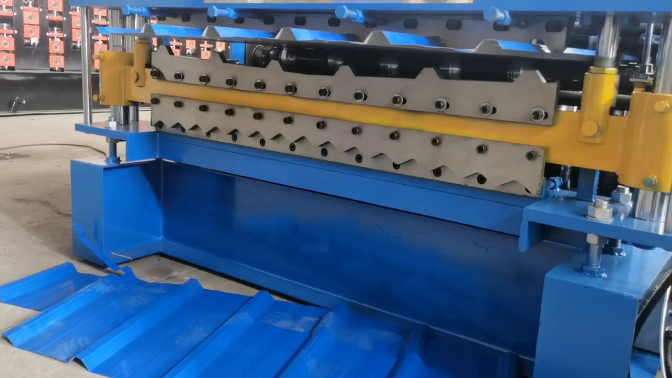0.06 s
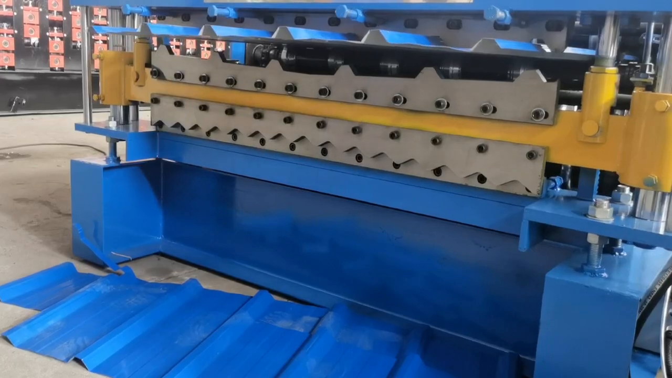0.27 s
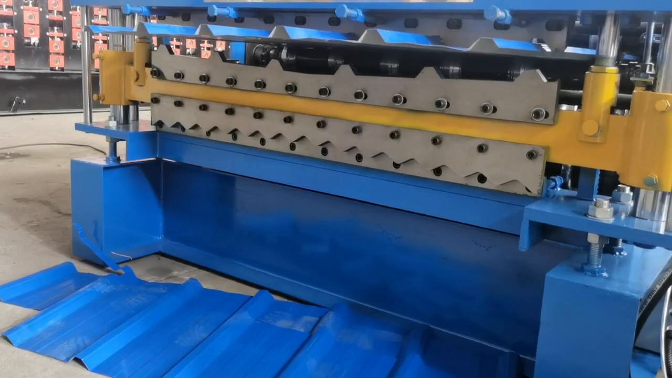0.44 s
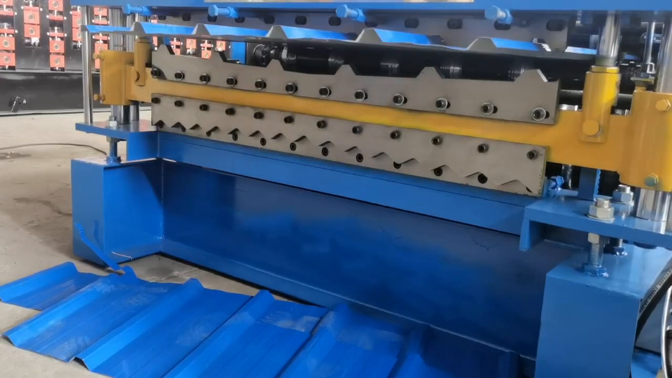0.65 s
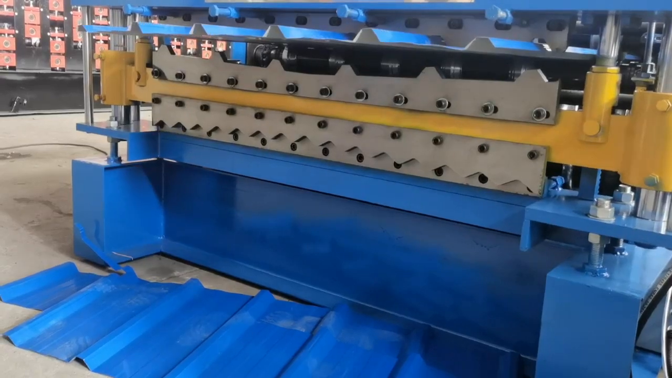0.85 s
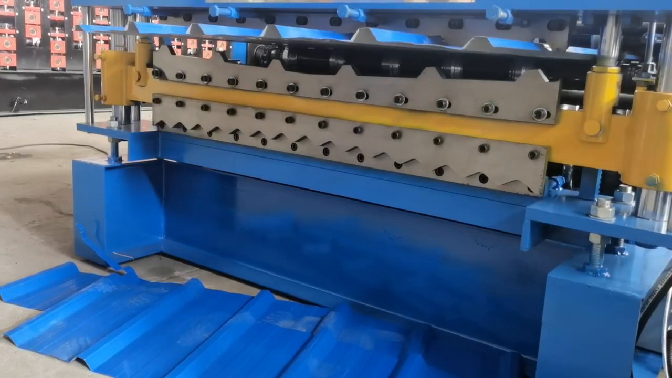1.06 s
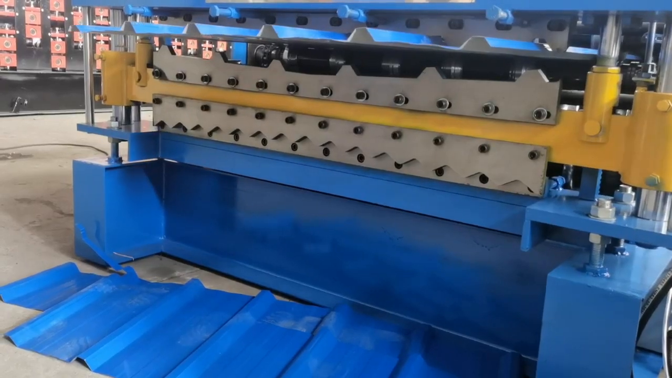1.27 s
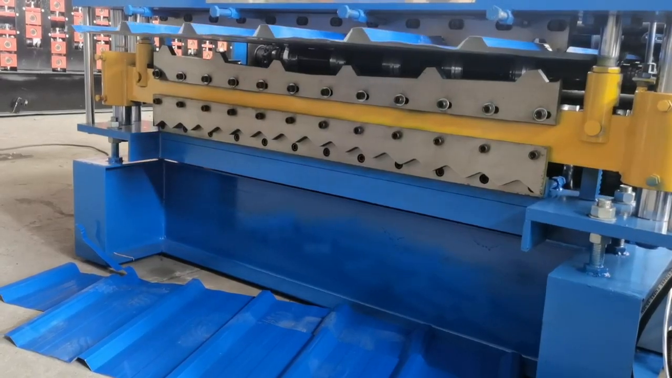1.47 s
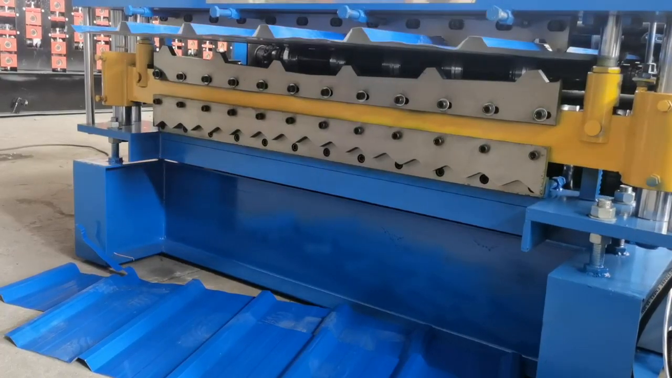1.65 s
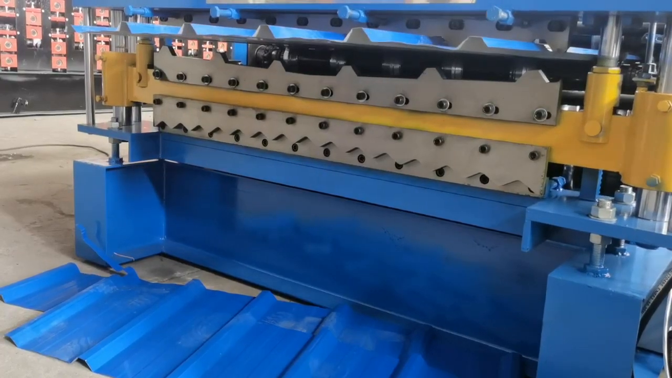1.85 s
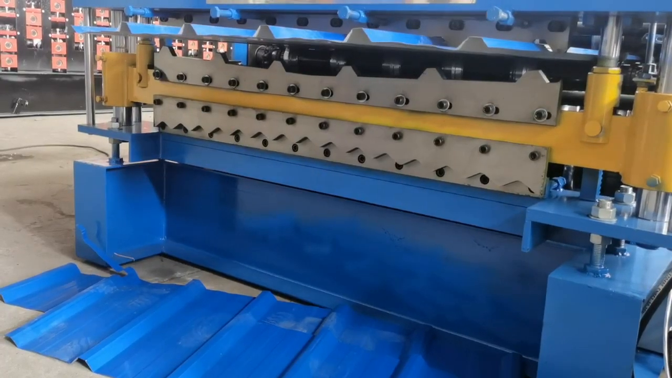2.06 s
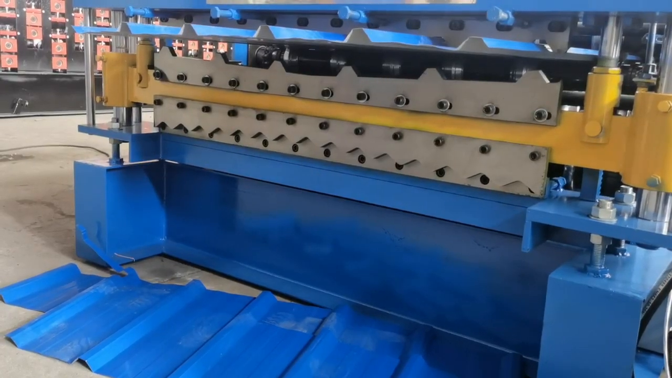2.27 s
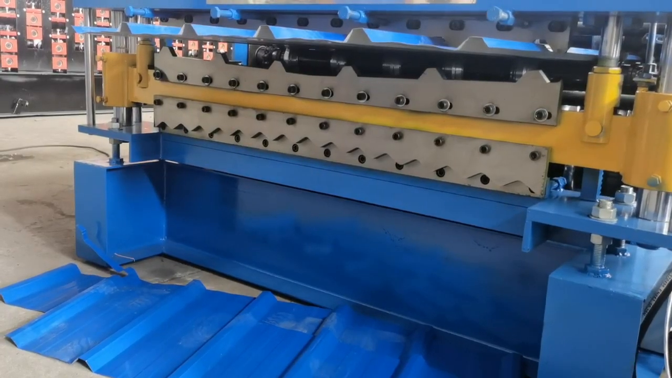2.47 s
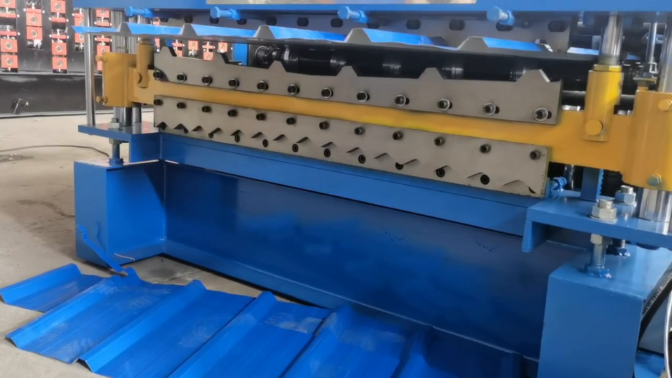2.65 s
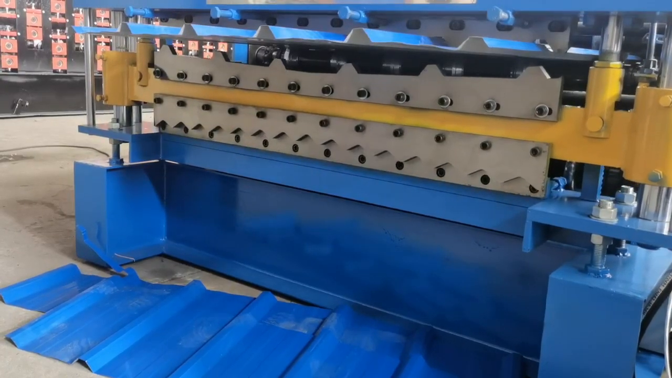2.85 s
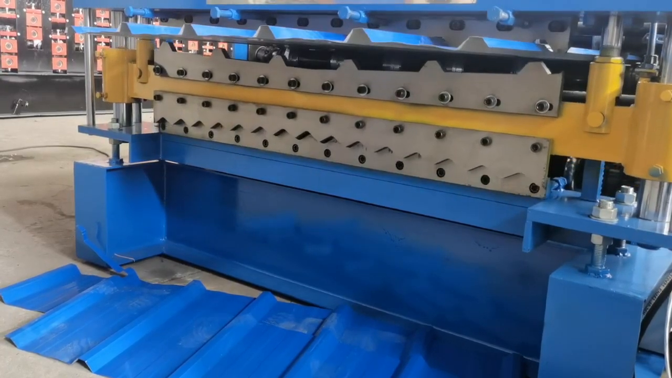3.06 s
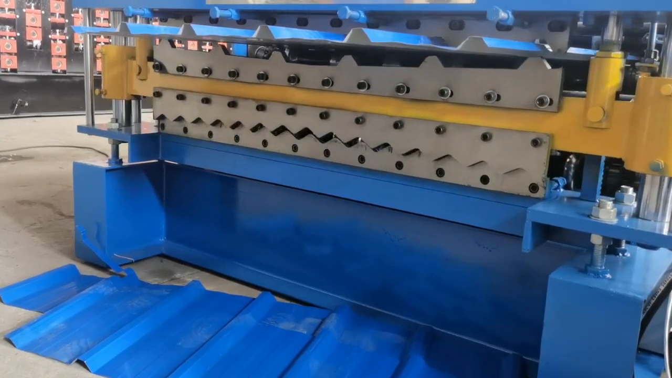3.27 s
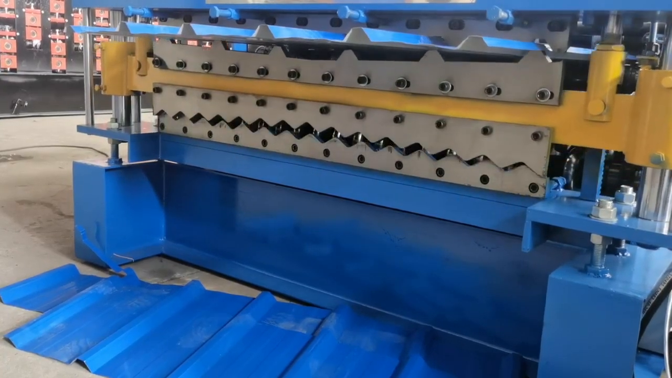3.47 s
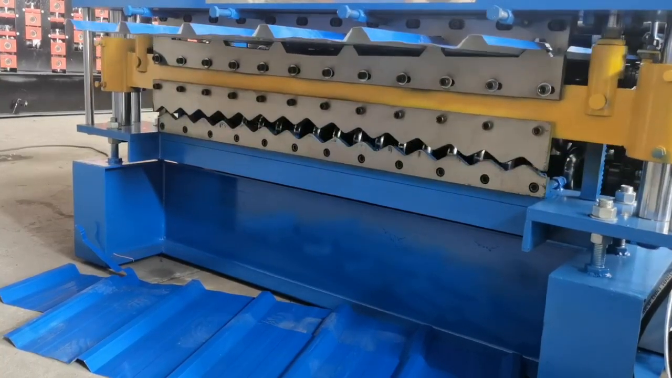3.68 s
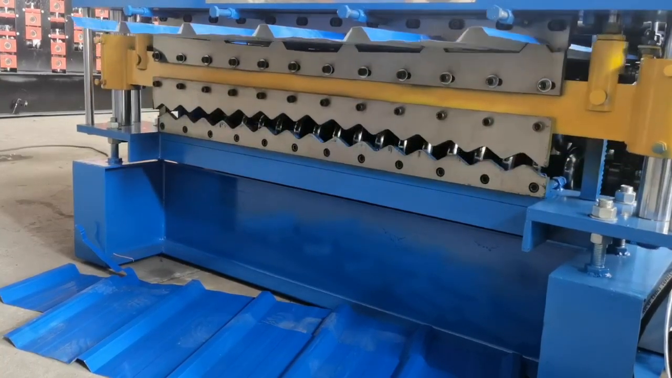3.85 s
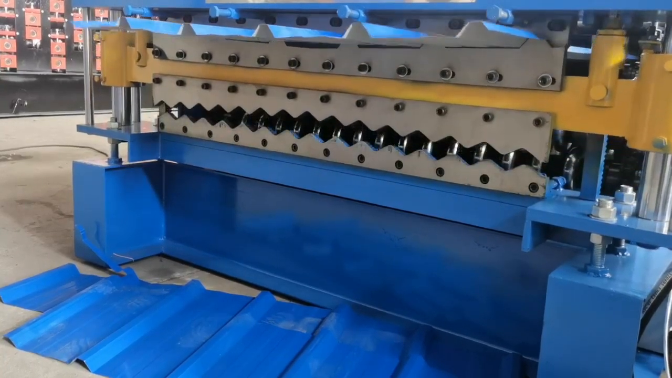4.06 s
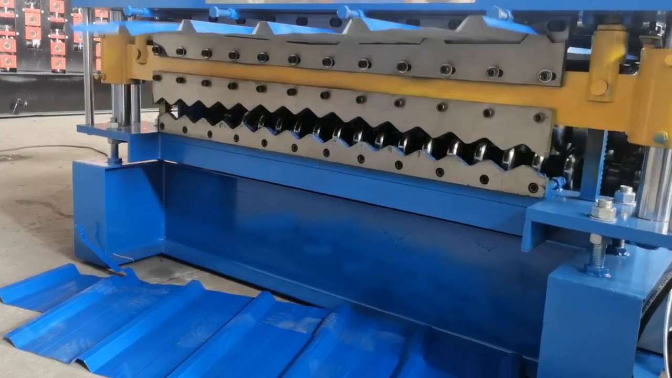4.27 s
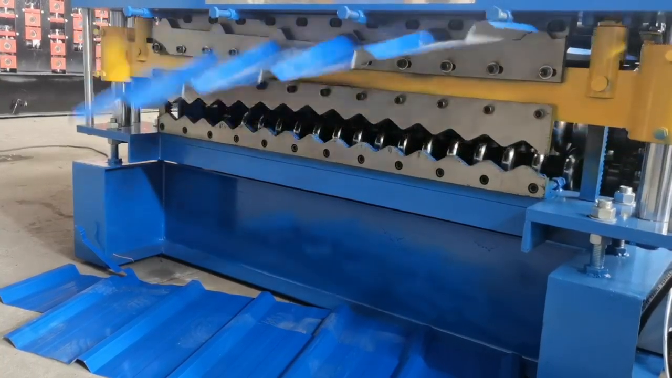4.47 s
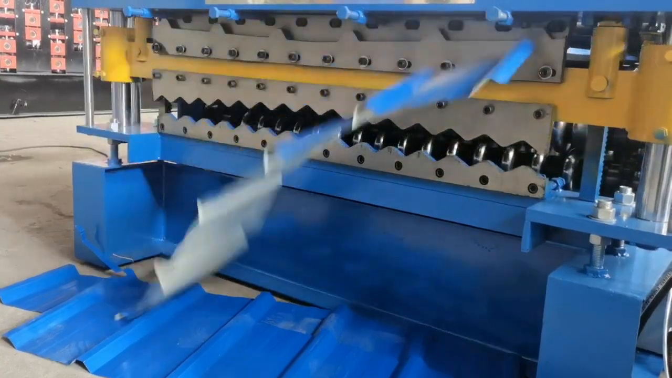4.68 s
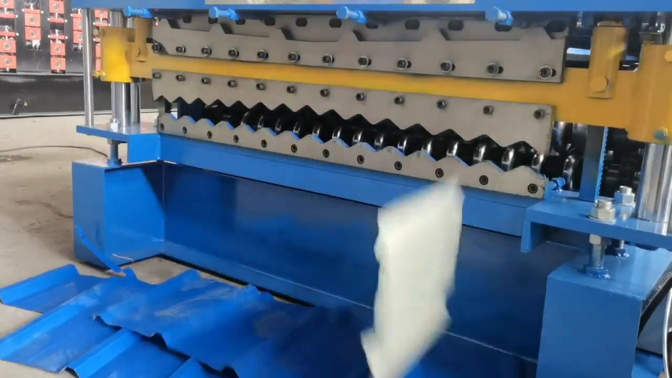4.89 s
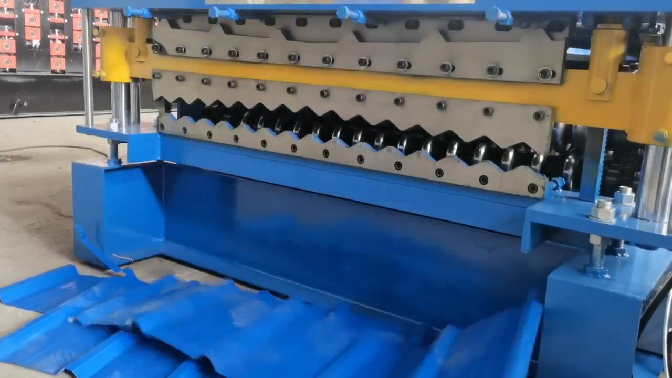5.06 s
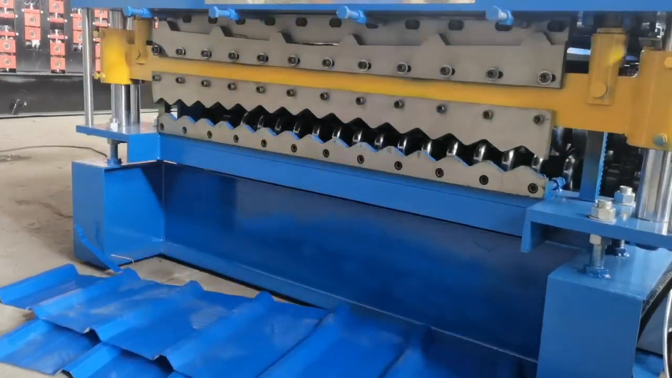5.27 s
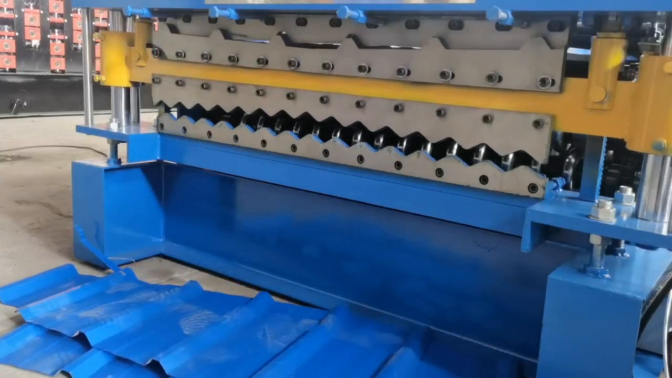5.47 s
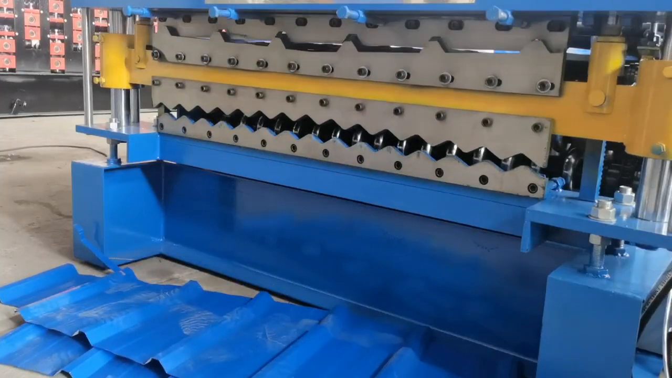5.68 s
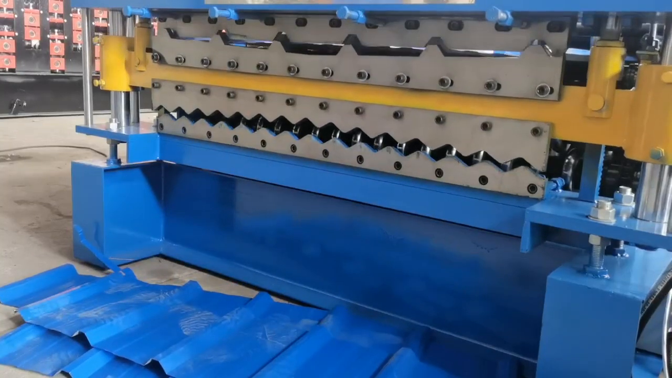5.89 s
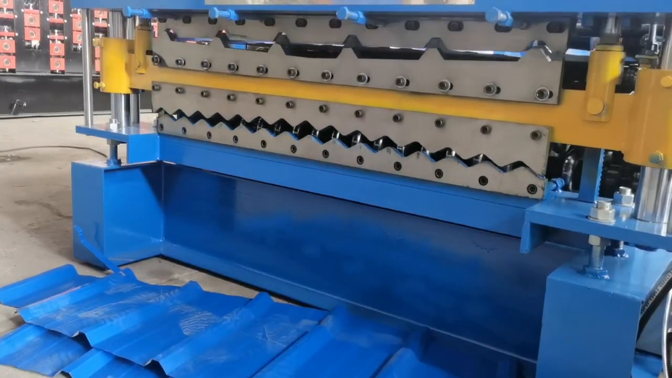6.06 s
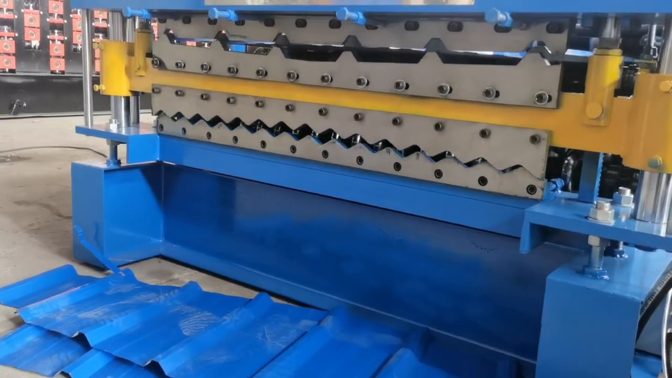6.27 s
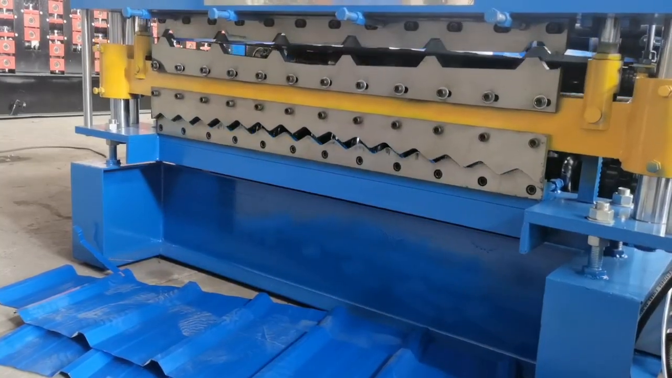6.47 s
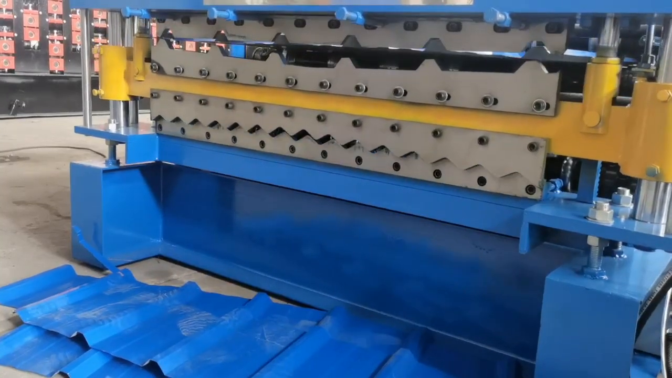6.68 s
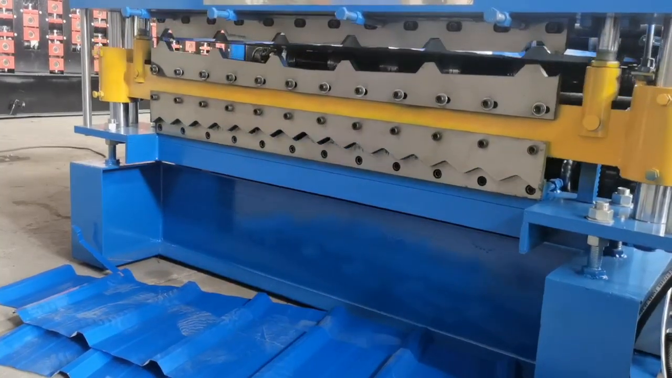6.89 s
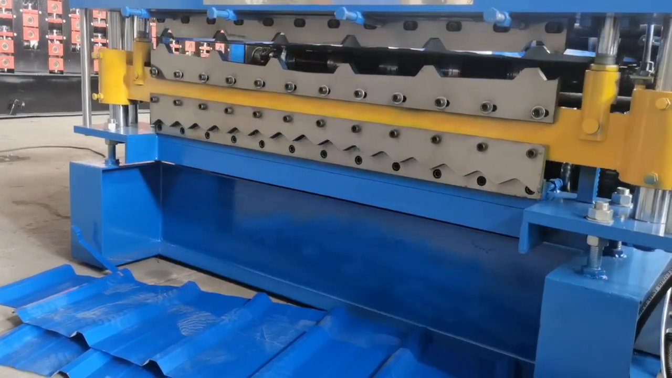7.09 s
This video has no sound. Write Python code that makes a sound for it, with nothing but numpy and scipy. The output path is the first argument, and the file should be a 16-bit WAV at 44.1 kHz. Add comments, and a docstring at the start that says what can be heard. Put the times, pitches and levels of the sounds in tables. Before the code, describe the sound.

Close view of a metal shear in an echoing workshop: low uneven machine hum, oil rush and a faint piercing electrical whine that soon drops away. The hydraulics shudder and strain, growing much louder. Then roofing steel buckles with dull booms, sharp cracks and tearing rattle, scrapes briefly, slaps onto a pile and rings out. The pump eases into a softer, steady hissing whir.

```python
"""Hydraulic shear cutting a roofing panel

The hydraulic shear of a roll forming line cuts off a thin steel panel in a factory hall.
The pump is built from tones locked to its shaft over filtered noise; a motor drive whines beside it.
The pump labours as the blade comes down, then eases on the return stroke.
The steel crackles and tears as random clicks and snaps ring its modes; the offcut crashes and rattles to rest."""
import sys
import numpy as np
from scipy import signal
from scipy.fft import rfft, irfft
from scipy.io import wavfile
from scipy.ndimage import uniform_filter1d, map_coordinates

SR = 44100
rng = np.random.default_rng(int(sys.argv[2]) if len(sys.argv) > 2 else 0)


def output_pcm(signal):
    """Save a mono or channel-first signal as 16-bit PCM at the path in sys.argv[1].

    Samples are clipped to [-1, 1] before scaling.
    """
    pcm = np.clip(np.atleast_2d(signal).T, -1, 1) * 32767
    wavfile.write(sys.argv[1], SR, np.round(pcm).astype(np.int16))


N = 314433
TIME = np.arange(N) / SR
# the cutting cycle: the valve opens, the ram takes up load, the blade is through, the valve reverses
VALVE_S, LOAD_S, THROUGH_S, RETURN_S = 2.34, 2.527, 4.365, 5.09
PRESSURE_RISE_S, PRESSURE_FALL_DB_PER_S = 1, 70
BOUT_ATTACK_S, BOUT_RELEASE_DB_PER_S = 0.011, 153   # how the steel's contacts start and die away
BOOM_S = 3.8   # the panel starts to boom and sway
FLEX, FLEX_PER_S = .02, 7   # the sheet's modes shift by about this share as it bends, and about this often


def from_db(db):
    """Decibels to gain."""
    return np.exp(np.asarray(db) * np.log(10) / 20)


def rms_one(x):
    """Scale to unit rms."""
    return x / np.sqrt(np.mean(x ** 2) + 1e-20)


def at_hz(points, hz):
    """Read a table on a log-frequency axis."""
    f, value = np.transpose(points)
    return np.interp(np.log(np.maximum(hz, 1)), np.log(f), value)


def noise(size=N):
    """White noise of spread 1."""
    return rng.standard_normal(size)


def band(x, low_hz, high_hz):
    """Causal band-pass."""
    sections = signal.butter(2, [low_hz, min(high_hz, SR / 2 - 1)], "band", fs=SR, output="sos")
    return signal.sosfilt(sections, x + 1e-18)


def through(x, response):
    """Play x through an impulse response."""
    return signal.oaconvolve(x, response)[:len(x)]


def colour(x, spectrum, size=8192):
    """Causal (minimum-phase) filter with the given spectrum."""
    gains = from_db(at_hz(spectrum, np.arange(size // 2 + 1) * SR / size))
    cepstrum = irfft(np.log(gains))
    # folding the cepstrum forward in time makes the filter minimum-phase
    cepstrum[1:size // 2] *= 2
    cepstrum[size // 2 + 1:] = 0
    return through(x, irfft(np.exp(rfft(cepstrum))))


def drift(rate):
    """Smooth random wander of spread 1, from random knots at twice the rate per second."""
    knots, coarse = noise(size=int(N / SR * rate * 2) + 4), TIME[::25]
    wander = map_coordinates(knots, [coarse * rate * 2], order=3, mode="nearest")
    return np.interp(TIME, coarse, rms_one(wander))


def rough_tone(hz, width_hz):
    """A narrow, unsteady tone that follows a pitch curve; rms 1."""
    phase = 2 * np.pi * np.cumsum(hz) / SR
    return rms_one(drift(width_hz) * np.cos(phase) + drift(width_hz) * np.sin(phase))


def envelope(start_s, end_s, attack_s, fall_db_per_s):
    """Rises toward 1 from the start, holds, and dies away after the end."""
    rise = 1 - np.exp(-np.maximum(TIME - start_s, 0) / attack_s)
    return rise * from_db(-fall_db_per_s * np.maximum(TIME - end_s, 0))


def swell_and_die(t, rise_s, t60):
    """Envelope of a struck mode; peak 1."""
    shape = (1 - np.exp(-t / rise_s)) * from_db(-60 * t / t60)
    return shape / shape.max()


def pressure():
    """Load on the ram, 0-1: builds as the blade presses and bleeds off once it is through."""
    return envelope(LOAD_S, THROUGH_S, PRESSURE_RISE_S, PRESSURE_FALL_DB_PER_S)


# colour of the steady hall noise: pitch_hz, level_db (per Hz, relative)
HALL_NOISE = [(35, -18), (100, -5), (300, -2.5), (600, -11), (1200, -15), (2500, -10.5), (5000, -30),
              (10500, -46), (13000, -70), (14000, -72)]


def hall_noise(level_db=-53):
    """Steady background noise of the hall, filtered from white noise."""
    return from_db(level_db) * rms_one(colour(noise(), HALL_NOISE))


def falling_hiss(start_s=6.6, start_hz=14050, sag_per_s=.6, start_db=-92, rise_db_per_s=32):
    """A very faint, narrow band of hiss near 14 kHz slides down and swells towards the end."""
    age = np.maximum(TIME - start_s, 0)
    gain = (TIME > start_s) * from_db(start_db + rise_db_per_s * age)
    return gain * rough_tone(start_hz * np.exp(-sag_per_s * age), width_hz=160)


# pushes of the distant clatter: start_s, end_s, level_db
FAR_PUSHES = [(0.309, 0.402, -45.5), (0.457, 0.56, -45.5), (0.6, 0.7, -57)]
# its dull colour: pitch_hz, level_db (per Hz, relative)
FAR_COLOUR = [(100, -14), (330, -0.5), (900, -12), (1300, -27), (2500, -57)]


def far_clatter(lumpy_db=2.0, fall_db_per_s=27):
    """A dull clatter far down the hall, its pushes blurred into a wash of noise."""
    power = 0
    for start_s, end_s, db in FAR_PUSHES:
        power = power + (from_db(db) * envelope(start_s, end_s, 0.016, fall_db_per_s)) ** 2
    return np.sqrt(power) * from_db(lumpy_db * drift(7.35)) * rms_one(colour(noise(), FAR_COLOUR))


# colour of the machine frame's rumble: pitch_hz, level_db (per Hz, relative)
FRAME_COLOUR = [(20, -60), (42, -34), (56, 0), (76, -7.5), (120, 3), (145, -16), (300, -20), (700, -18.5),
                (1500, -50)]


def frame(rumble_db=-51, load_db=-47, hum_hz=58.4, hum_db=-51, return_hum_db=-57,
          drone_db=-32, return_drone_db=-54, shudder_db=-45, shudder_hz=71):
    """Rumble, an uneven hum, a shudder as the ram starts, and a resonance that drones under load."""
    load = pressure()
    rumble = (from_db(rumble_db) + from_db(load_db) * load) * rms_one(colour(noise(), FRAME_COLOUR))
    # the hum eases after the cut
    hum_gain = from_db(np.interp(TIME, [THROUGH_S, RETURN_S], [hum_db, return_hum_db]))
    hum = hum_gain * np.sqrt(2) * np.sin(2 * np.pi * hum_hz * TIME + .5 * drift(8.6))
    shudder_gain = from_db(shudder_db) * envelope(VALVE_S, VALVE_S + 0.099, attack_s=0.0097, fall_db_per_s=90)
    shudder = shudder_gain * np.sin(2 * np.pi * shudder_hz * TIME)
    # the drone is heard faintly on the return stroke too
    drone_gain = from_db(return_drone_db) * (TIME > RETURN_S) + from_db(drone_db) * load
    drone = drone_gain * rms_one(band(noise(), 98.0, 115.7))
    return rumble + hum + shudder + drone


# switching whine of the motor drive: pitch_hz, level_db (rms, before the fades)
DRIVE_TONES = [(5981, -63), (6020, -54.5), (11843, -82)]


def drive(stop_s=1.43, standby_db=-23, hiss_db=-58, hiss_low_hz=5900, hiss_high_hz=6900):
    """The feed motor's switching tones drop to a trace when the feed stops; they and a hiss fade with the cut."""
    feeding = envelope(0, stop_s, attack_s=0.0016, fall_db_per_s=444)
    powered = envelope(0, LOAD_S, attack_s=.002, fall_db_per_s=52)
    tones = 0
    for hz, db in DRIVE_TONES:
        tones = tones + np.sqrt(2) * from_db(db) * np.sin(2 * np.pi * (hz * TIME + rng.random()))
    hiss = rms_one(band(noise(), hiss_low_hz, hiss_high_hz))
    return (feeding + from_db(standby_db) * powered) * tones + from_db(hiss_db) * powered * hiss


VALVE_TRAVEL_S = 0.035
IDLE_DB, IDLE_RISE_DB_PER_S, IDLE_FALL_DB_PER_S = -46, 1.08, 65   # oil rush while the pump idles
FREE_RAM_DB, FULL_LOAD_DB = -51.5, -27   # oil rush with the ram running free, and what full pressure adds
RUSH_BUILD_S = 0.18   # turbulence lags a little behind the pressure
RETURN_DB, RETURN_RISE_DB_PER_S = -53, 2   # oil rush on the return stroke


def oil_flows():
    """Strength of the flow through the idle, cutting and return positions of the valve."""
    idle_fall_db = IDLE_FALL_DB_PER_S * np.maximum(TIME - VALVE_S, 0)
    idle = from_db(IDLE_DB + IDLE_RISE_DB_PER_S * TIME - idle_fall_db)
    free_ram = from_db(FREE_RAM_DB) * envelope(VALVE_S, THROUGH_S, VALVE_TRAVEL_S, PRESSURE_FALL_DB_PER_S)
    loaded = from_db(FULL_LOAD_DB) * pressure() * envelope(LOAD_S, TIME[-1], RUSH_BUILD_S, 0)
    returning = from_db(RETURN_DB + RETURN_RISE_DB_PER_S * (TIME - RETURN_S))
    returning = returning * envelope(RETURN_S, TIME[-1], VALVE_TRAVEL_S, 0)
    return np.array([idle, free_ram + loaded, returning])


VANES = 10


def oil_rush(turns, spectrum, repeating, pulsing):
    """Part of the rush repeats on every turn of the shaft; all of it swells as each vane passes."""
    one_turn = noise(size=1800)
    locked = map_coordinates(one_turn, [turns % 1 * len(one_turn)], order=3, mode="wrap")
    swell = 1 + pulsing * np.cos(2 * np.pi * VANES * turns) + 0.14 * np.cos(2 * np.pi * turns)
    return rms_one(colour((noise() + repeating * locked) * swell, spectrum))


# resonances and dips of the pump casing and its pipes: pitch_hz, width_hz, level_db
CASING = [(1880, 55, -10), (4344, 81, 6), (4480, 87, -9.5), (4600, 77, 5), (4030, 92, -5)]


def casing(x):
    """The casing lifts the rush at its resonances and hollows it at its dips."""
    for hz, width_hz, db in CASING:
        w, a = 2 * np.pi * hz / SR, from_db(db / 2)
        half = np.pi * width_hz / SR
        top = [1 + half * a, -2 * np.cos(w), 1 - half * a]
        bottom = [1 + half / a, -2 * np.cos(w), 1 - half / a]
        x = signal.lfilter(top, bottom, x)
    return x


# pump motor, which slips under load: time_s, turns_per_s
SHAFT = [(0, 24.905), (2.3, 24.9), (2.45, 24.77), (2.75, 24.61), (3.05, 24.5), (3.7, 24.5), (4.6, 24.6),
         (5.6, 24.68), (7.13, 24.665)]
# vane harmonics and sidebands: shaft_multiple, idle_db, cutting_db, return_db (before the shared lift)
PUMP_TONES = [(10, -68.0, -42, -58.5), (19, -80.0, -55.5, -65.5), (20, -78.0, -49, -68),
              (35, -68.5, -54, -66), (36, -63.0, -51, -68), (59, -63.0, -67.0, -79.5),
              (60, -61, -52.0, -66.0), (61, -66, -59, -78), (68, -68.0, -52, -70), (69, -62.5, -48, -57.5),
              (70, -80.5, -49.0, -52.5), (79, -60.5, -47.0, -64.5), (80, -68.0, -49.5, -68.0),
              (81, -67.5, -50, -79.0), (90, -76.5, -45.5, -63.5), (91, -82, -53.5, -66.0),
              (100, -70, -46.5, -64.5), (104, -68, -54, -65), (109, -60.5, -54, -66.0),
              (119, -66.0, -46, -67.5), (120, -58.5, -39.5, -60), (129, -64.0, -53.0, -68.5),
              (130, -65.5, -48.5, -75.5), (150, -60.5, -63, -76), (173, -58.0, -61.0, -79),
              (178, -80.0, -52.5, -80), (179, -66, -60, -86)]
# oil rush (idle, cutting, return) at which the tones have their listed strength: level_db
STEADY_DB = [-42, -30, -48]
# colour of the oil rush in each valve position: pitch_hz, level_db (per Hz, relative)
IDLE_OIL = [(200, -3.5), (600, -18.5), (1200, -23.5), (1700, -10), (2900, 1.5), (4000, -8), (4300, -2.5),
            (4650, -5.5), (5300, -28.5), (6300, -38), (8300, -41), (10700, -32), (14000, -63)]
CUTTING_OIL = [(150, -1.5), (450, -6.5), (800, -15.5), (1300, -16), (1700, -0.5), (2700, 3.5), (3700, -5),
               (4400, -3), (5200, -15), (6700, -13), (8200, -33), (10700, -30.5), (14000, -51)]
RETURN_OIL = [(200, -3.5), (480, -7), (650, -1), (1200, -13), (1800, 8.5), (2600, 11), (4000, -3.5),
              (4350, 0.5), (5000, -13), (6500, -6.5), (8200, -24.5), (12000, -71)]
RETURN_SURGE_DB, RETURN_SETTLE_S = -25.5, 0.24   # the trapped oil escapes as the valve reverses
THROB_TURN, THROB_SPREAD_TURNS = .62, .07   # where in each turn of the shaft the pump works hardest
WHINE_TOP_LOAD = 0.65   # share of full pressure beyond which the cutting tones grow no louder
RETURN_WHINE_BUILD_S = 0.31   # the tones of the return stroke emerge slowly


def pump(waver_db=1.63, phase_wander=0.19, lift_db=2.0, beat=0.4, sing_db=-40.0, sing_s=0.36):
    """Tones on multiples of the shaft rate over the rush of oil; the pressure line sings as the valve opens."""
    turns = np.cumsum(np.interp(TIME, *np.transpose(SHAFT))) / SR
    flows = oil_flows()
    rush = flows[0] * oil_rush(turns, IDLE_OIL, repeating=0.62, pulsing=0.065)
    rush += flows[1] * oil_rush(turns, CUTTING_OIL, repeating=0.5, pulsing=0.074)
    settling = np.exp(-np.maximum(TIME - RETURN_S, 0) / RETURN_SETTLE_S)
    surge = (TIME > RETURN_S) * from_db(RETURN_SURGE_DB) * settling
    rush += (flows[2] + surge) * oil_rush(turns, RETURN_OIL, repeating=0.63, pulsing=0.048)
    out = casing(rush)
    # the cutting tones need pressure, not just flow
    flows[1] = from_db(FULL_LOAD_DB) * np.minimum(pressure(), WHINE_TOP_LOAD)
    flows[2] *= envelope(RETURN_S, TIME[-1], RETURN_WHINE_BUILD_S, 0)
    wavers, starts = [drift(5) for _ in range(7)], rng.random(len(PUMP_TONES))
    throb_angles = THROB_TURN + THROB_SPREAD_TURNS * noise(size=len(PUMP_TONES))
    for multiple, *state_db in PUMP_TONES:
        # a vane harmonic and its sidebands stay in step, so each group throbs once a turn
        group = round(multiple / VANES)
        gain = from_db(np.array(state_db) - STEADY_DB + lift_db) @ flows
        waver = from_db(waver_db * wavers[group % len(wavers)])
        phase = 2 * np.pi * (multiple * (turns - throb_angles[group]) + starts[group])
        phase = phase + phase_wander * wavers[(group + 2) % len(wavers)]
        out += np.sqrt(2) * gain * waver * np.cos(phase)
    # the line sings on the seventh vane harmonic, beating with a tone one shaft rate below
    shaft_turns = turns - throb_angles[7]
    seventh = 2 * np.pi * (7 * VANES * shaft_turns + starts[7])
    sing = np.cos(seventh) + beat * np.cos(seventh - 2 * np.pi * shaft_turns)
    sing_shape = envelope(VALVE_S, VALVE_S + sing_s, attack_s=0.3, fall_db_per_s=28)
    return out + from_db(sing_db) * sing_shape * sing


def valve_tick(start_s=2.328, level_db=-55):
    """A faint bright tick of noise as the valve switches over."""
    age = np.maximum(TIME - start_s, 0)
    shape = from_db(-60 * age / .12) * (1 - np.exp(-age / .012))
    return from_db(level_db) * shape * rms_one(band(noise(), 8850, 12000))


def wobble(level_db=-45, end_s=4.56):
    """The wide loose panel sways and pumps the air until it tips off the die."""
    sway = envelope(BOOM_S, end_s, .08, BOUT_RELEASE_DB_PER_S)
    return from_db(level_db) * sway * rms_one(band(noise(), 42, 88))


# bare edges scrape over the die and the pile: start_s, end_s, level_db, squeal_hz (at the start)
SCRAPES = [(4.496, 4.542, -30, 4410), (4.612, 4.638, -30, 4420), (5.178, 5.2, -31, 6860)]


def scrapes(grit_db=-2, sag_per_s=1.2):
    """An edge sticks and slips: grit around a rough squeal that sags as the edge slides on."""
    out, grit = 0, rms_one(band(noise() * drift(250), 3800, 7900))
    for start_s, end_s, db, hz in SCRAPES:
        squeal = rough_tone(hz * np.exp(-sag_per_s * np.abs(TIME - start_s)), width_hz=220)
        contact = envelope(start_s, end_s, BOUT_ATTACK_S, 300)
        out = out + from_db(db) * contact * rms_one(squeal + from_db(grit_db) * grit)
    return out


# the whole panel buckles under the blade, then slaps flat on the pile:
# start_s, pitch_hz, level_db (peak of the note alone)
THUDS = [(3.844, 152, -25), (3.885, 116, -22.5), (3.938, 104, -24), (3.941, 62, -28), (4.052, 265, -21.5),
         (4.095, 324, -24.5), (4.148, 264, -26), (4.222, 118, -25), (4.273, 298, -21.5), (4.312, 152, -25),
         (4.745, 371, -30), (4.855, 367, -21.5), (4.876, 49.7, -36), (4.96, 384.5, -23.5),
         (5.153, 555, -23)]


def thuds(rise_s=0.0056, t60_s=0.13, bend=0.071, rustle_db=-8):
    """Each buckle is a low note that starts sharp and sags as the panel relaxes, with rustle around it."""
    out, t = np.zeros(N), TIME[:SR // 2]
    shape = swell_and_die(t, rise_s, t60_s)
    for s, hz, peak_db in THUDS:
        pitch_hz = hz * (1 + bend * np.exp(-t / 0.018))   # bend: share by which the pitch starts sharp
        note = np.sin(2 * np.pi * np.cumsum(pitch_hz) / SR)
        rustle = from_db(rustle_db) * rms_one(band(noise(size=len(t)), hz * 0.48, hz * 2.15))
        start = round(s * SR)
        out[start:start + len(t)] += from_db(peak_db) * shape * (note + rustle)
    return out


# colour of the sound the sheet gives off: pitch_hz, level_db (per Hz, relative)
SHEET_COLOUR = [(290, -9), (375, -4.5), (450, -11), (560, -9), (950, -3.5), (1280, 1.5), (1950, -4.5),
                (2480, 3), (3650, -12), (4350, -6.5), (5000, -18.5), (6900, -13.5), (8300, -29),
                (10600, -27), (14000, -32.5)]
# its longest-ringing modes: pitch_hz, level_db (relative, before a random spread)
SHEET_MODES = [(375, -2), (515, -2), (555, 0), (931, -1), (1153, 1), (1282, 3), (1403, 0), (1515, 1),
               (1686, 2), (2167, 2), (2258, 2), (2470, 4), (2524, 5)]


def sheet_response(crack, dense_t60, modes_db, modes_t60, mode_spread_db=4):
    """One snap of thin steel: a crack, a crowd of short modes and a few that ring on and bend; unit energy."""
    t = TIME[:SR]
    crowd = rms_one(noise(size=len(t)) * from_db(-60 * t / dense_t60))
    crowd = crowd + crack * rms_one(noise(size=len(t)) * from_db(-60 * t / 0.0053))
    flexing = np.sin(2 * np.pi * (FLEX_PER_S * t * rng.uniform(0.52, 1) + rng.random()))
    bent_time = np.cumsum(1 + FLEX * flexing) / SR
    modes = 0
    for hz, db in SHEET_MODES:   # new strengths each time
        strength = from_db(db + mode_spread_db * rng.normal()) * rng.choice([-1, 1])
        modes = modes + strength * np.sin(2 * np.pi * hz * bent_time)
    ringing = rms_one(modes * from_db(-60 * t / modes_t60))
    response = rms_one(colour(crowd, SHEET_COLOUR)) + from_db(modes_db) * ringing
    return response / np.linalg.norm(response)


# bouts of rattling as the sheet is sheared, tips over the die, lands and settles on the pile:
# start_s, end_s, clatter_db, flap_db
BOUTS = [(3.783, 3.847, -23.5, -30), (3.894, 4.41, -23.5, -31), (4.41, 4.533, -21, -34),
         (4.608, 4.657, -19.5, -28.5), (4.731, 4.874, -21.5, -27.5), (4.927, 5.112, -21.5, -32),
         (5.117, 5.234, -21, -29.5)]
BOOM_END_S, BOOM_DB, BOOM_FALL_DB_PER_S = 4.4, -32.5, 22.5   # the clamped panel booms until it comes loose
CRACKLE_DB = -24   # top fizz of the steel, relative to the clatter


def rattle(per_s=420, spread_db=3.5, surge_db=1.0, count=6):
    """Dense slips and buckles ring the sheet: clatter, flap and fizz in bouts, and a boom while it is held."""
    steel = 0
    for _ in range(count):   # regions of the sheet take turns, each with its own mode strengths
        sizes = from_db(spread_db * np.minimum(rng.exponential(1, N), 2) + 5.4 * drift(5))
        clicks = (rng.random(N) < per_s / count / SR) * sizes * rng.choice([-1, 1], N)
        response = sheet_response(crack=0.46, dense_t60=0.18, modes_db=-12.5, modes_t60=0.24)
        steel = steel + through(clicks, response)
    # bending shifts every resonance
    bent_samples = np.cumsum(1 + FLEX * drift(FLEX_PER_S))
    steel = map_coordinates(steel, [bent_samples], order=3, mode="mirror")
    # the overall force stays even
    steel = steel / np.sqrt(np.abs(uniform_filter1d(steel ** 2, size=1500)) + 1e-12)
    clatter, flap = 0, 0
    for start_s, end_s, clatter_db, flap_db in BOUTS:
        contact = envelope(start_s, end_s, BOUT_ATTACK_S, BOUT_RELEASE_DB_PER_S)
        clatter = np.maximum(clatter, from_db(clatter_db) * contact)
        flap = np.maximum(flap, from_db(flap_db) * contact)
    boom = from_db(BOOM_DB) * envelope(BOOM_S, BOOM_END_S, BOUT_ATTACK_S, BOOM_FALL_DB_PER_S)
    sound = clatter * from_db(surge_db * drift(20)) * rms_one(band(steel, 1210, 8900))
    sound += boom * from_db(surge_db * drift(10)) * rms_one(band(band(steel, 134, 460), 72, 490))
    sound += flap * from_db(surge_db * drift(18)) * rms_one(band(band(steel, 436, 763), 220, 1130))
    crackle = rms_one(band(band(steel, 8260, 11000), 8800, 14000))
    return sound + clatter * from_db(CRACKLE_DB) * crackle


# sharp snaps and landings; each spot of the sheet favours one ringing pitch:
# start_s, strength_db (relative), ring_hz
SNAPS = [(3.781, -15.5, 2500), (3.818, -9.5, 2720), (3.916, -12.5, 878), (4.005, -6, 2407),
         (4.062, -6.5, 3520), (4.069, -12, 1250), (4.112, -11, 2560), (4.171, -15, 936), (4.228, -15, 2590),
         (4.334, -15, 1735), (4.372, -14, 2456), (4.421, -13.5, 1310), (4.528, -5.5, 2380),
         (4.559, -12, 2510), (4.602, -1.5, 1105), (4.648, -11, 2450), (4.77, -8.5, 2400), (4.802, -6, 1303),
         (4.823, -8, 2500), (4.846, -9, 1540), (4.907, -9, 2430), (4.994, -6, 2274), (5.011, -10, 1270),
         (5.03, -14, 2450), (5.113, -10.5, 2510), (5.182, -8, 2480)]
# bright ticks of the bare edge: start_s, strength_db (relative), t60_s
TICKS = [(3.781, -16.5, .29), (3.916, -10.5, 0.5), (4.062, -13.5, .68), (4.171, -15.5, .47),
         (4.52, -17, 0.54), (4.602, -16, .25), (4.806, -13.5, 1), (4.887, -13.5, .037), (5.182, -17.5, .16)]
# their colour: pitch_hz, level_db (per Hz, relative)
TICK_COLOUR = [(2000, -19), (4300, 6), (7000, 5.5), (8400, -10), (10600, 1), (14000, -19)]


def snaps(body_db=16.5, ring_db=-14.0, ring_follows=0.46, tick_db=17.5, tick_rise_s=0.0012):
    """Ribs give way one by one, then the offcut hits the die and the pile; bare edges add bright ticks."""
    out, t = np.zeros(N), TIME[:SR]
    for s, strength_db, ring_hz in SNAPS:
        response = sheet_response(crack=0.25, dense_t60=0.28, modes_db=-9, modes_t60=0.5)
        body = from_db(strength_db + body_db) * band(response, 270, 16000)
        ring = swell_and_die(t, rise_s=0.0019, t60=0.06) * np.sin(2 * np.pi * ring_hz * t)
        # the ring grows less than the body in harder snaps
        out[round(s * SR):][:len(t)] += body + from_db(ring_db + ring_follows * strength_db) * ring
    for s, db, t60 in TICKS:
        tick = colour(noise(size=len(t)) * swell_and_die(t, tick_rise_s, t60), TICK_COLOUR)
        out[round(s * SR):][:len(t)] += from_db(db + tick_db) * tick / np.linalg.norm(tick)
    return out


# how long the hall rings: pitch_hz, t60_s
HALL_T60 = [(100, 0.47), (500, 1.2), (2000, 0.78), (4000, 0.89), (7000, 0.57)]


def hall(x, wet_db):
    """Direct sound plus a diffuse tail of noise bands, each dying at its own rate."""
    t, tail = TIME[:2 * SR], 0
    edges = np.geomspace(40, 16000, 13)
    for low, high in zip(edges, edges[1:]):
        decay = from_db(-60 * t / at_hz(HALL_T60, np.sqrt(low * high)))
        tail = tail + band(noise(size=len(t)), low, high) * decay
    tail = tail * (1 - np.exp(-t / 0.031))   # the tail builds up softly
    return x + from_db(wet_db) * through(x, tail / np.linalg.norm(tail))


def scene():
    """The steady machine, with the crash of the sheet ringing through the hall."""
    background = hall_noise() + falling_hiss() + far_clatter()
    machine = frame() + drive() + pump() + valve_tick()
    steel = hall(scrapes() + thuds() + rattle() + snaps(), wet_db=-7.5)
    return (background + machine + wobble() + steel)[None]


def record(dry, cutoff_hz=14050):
    """The deepest bass and the top are cut."""
    trimmed = band(dry, 28, 21000)
    return signal.sosfilt(signal.ellip(10, .2, 80, cutoff_hz, fs=SR, output="sos"), trimmed)


dry = scene()
out = record(dry)
output_pcm(out)
```